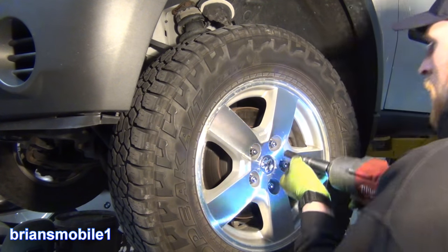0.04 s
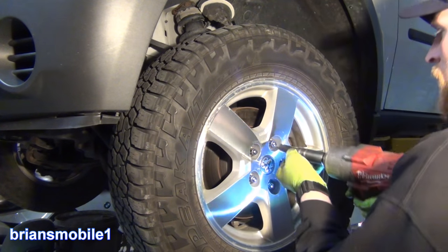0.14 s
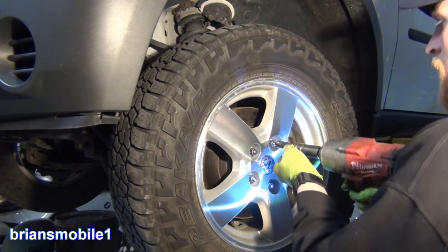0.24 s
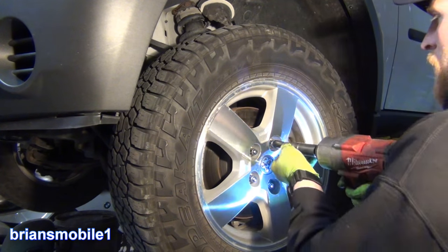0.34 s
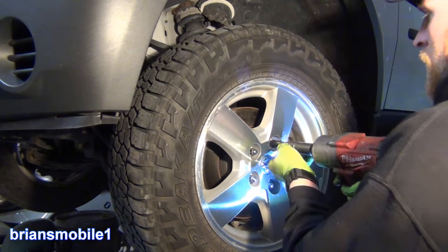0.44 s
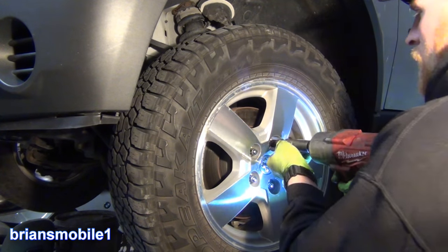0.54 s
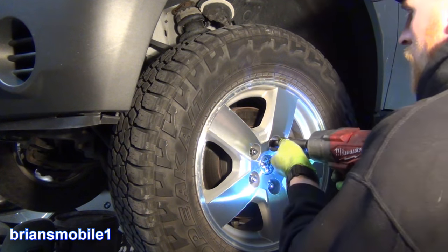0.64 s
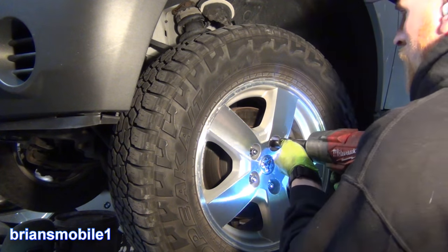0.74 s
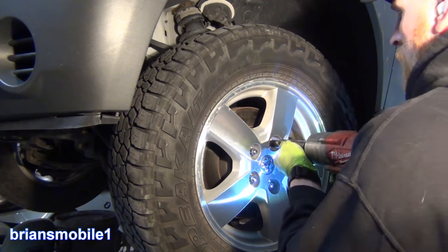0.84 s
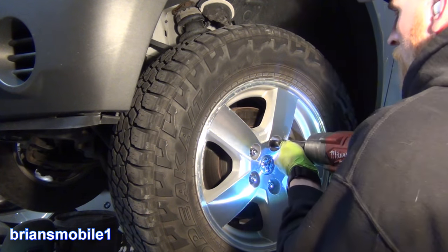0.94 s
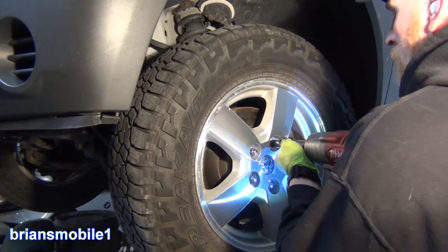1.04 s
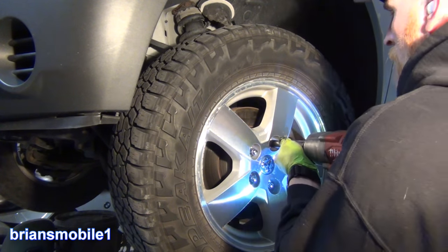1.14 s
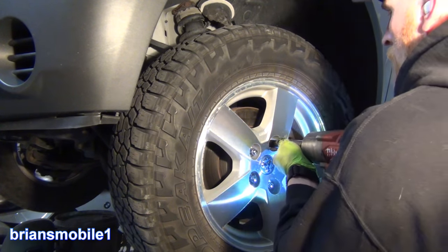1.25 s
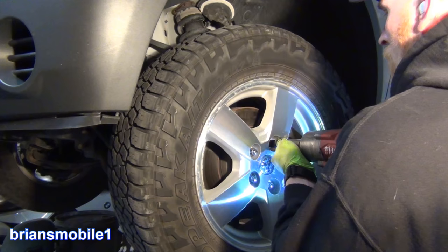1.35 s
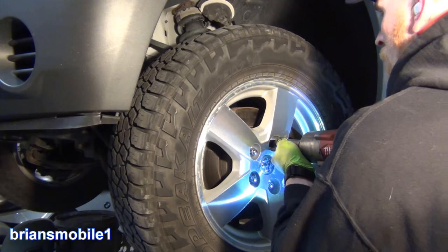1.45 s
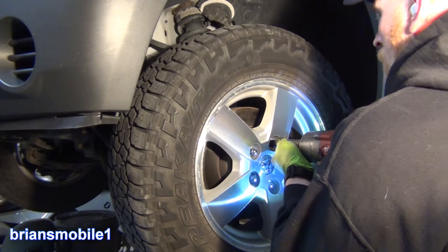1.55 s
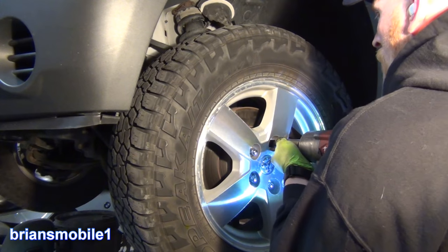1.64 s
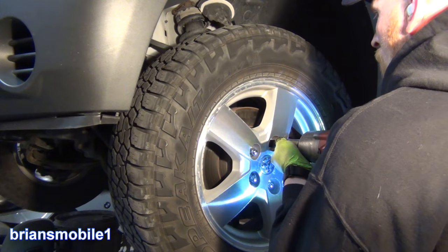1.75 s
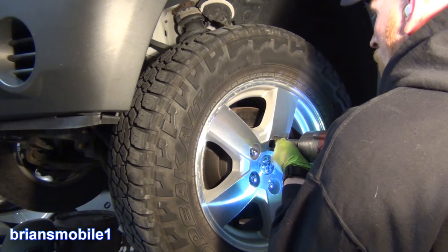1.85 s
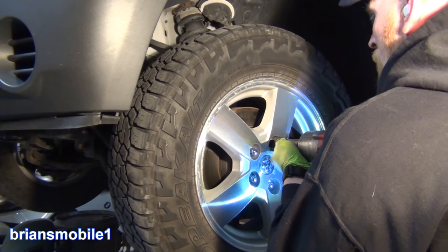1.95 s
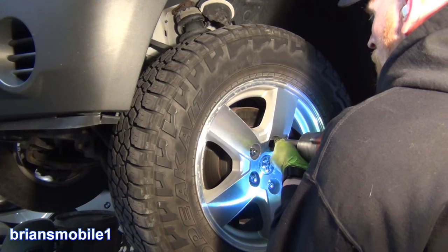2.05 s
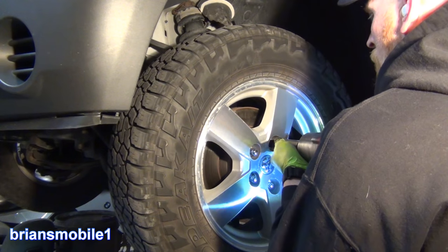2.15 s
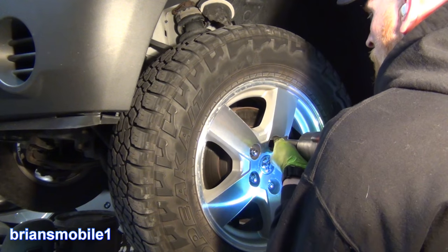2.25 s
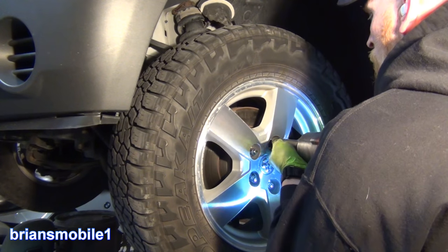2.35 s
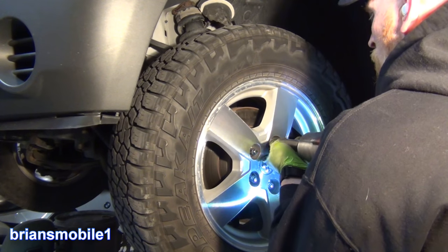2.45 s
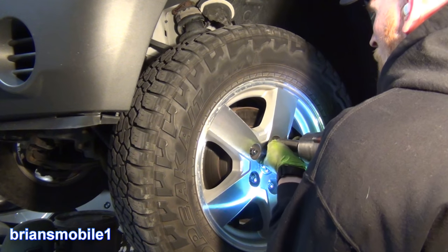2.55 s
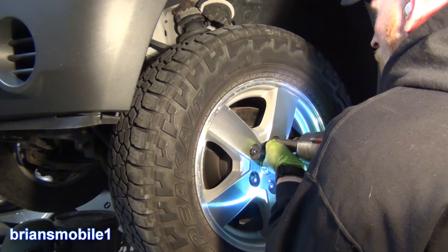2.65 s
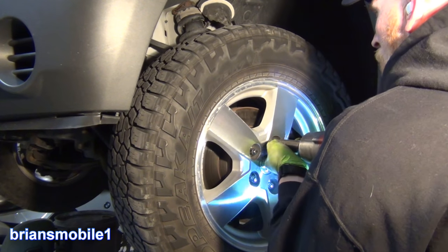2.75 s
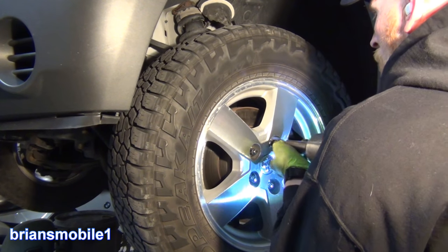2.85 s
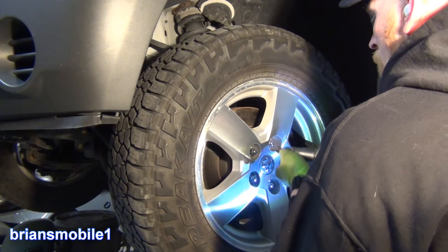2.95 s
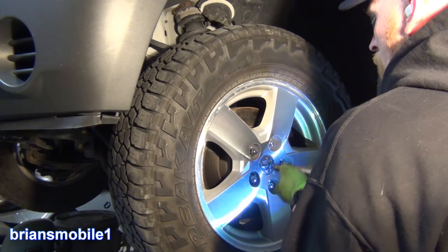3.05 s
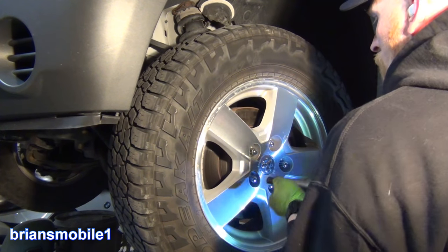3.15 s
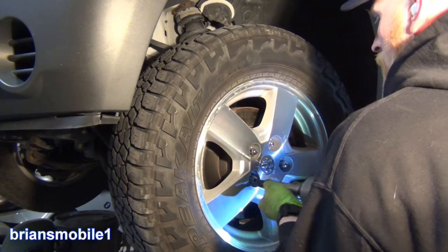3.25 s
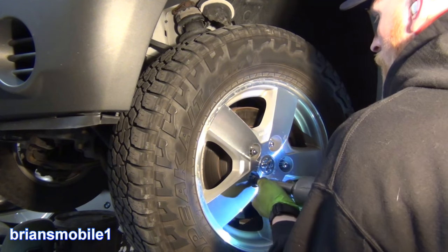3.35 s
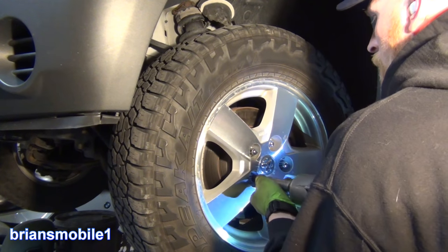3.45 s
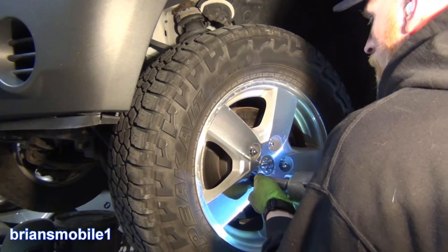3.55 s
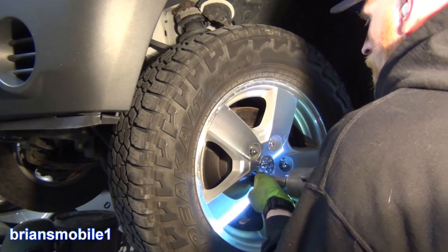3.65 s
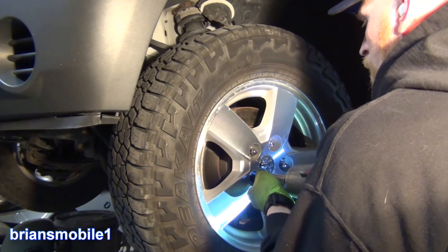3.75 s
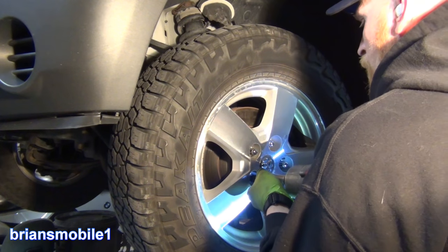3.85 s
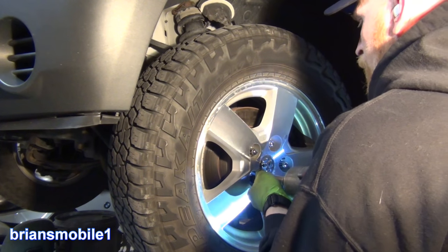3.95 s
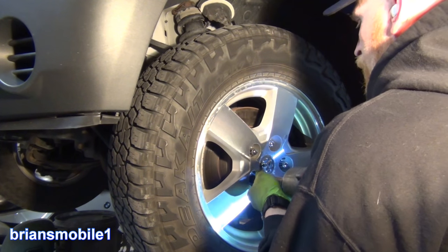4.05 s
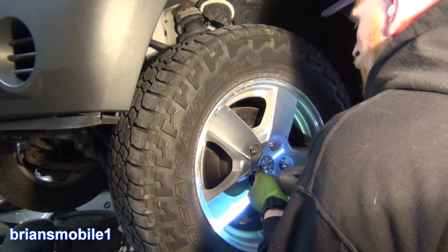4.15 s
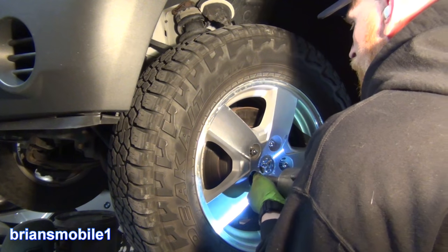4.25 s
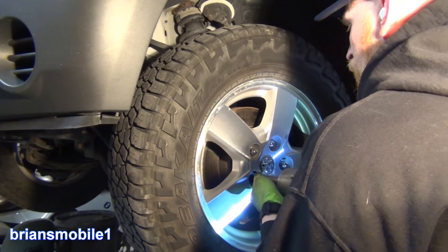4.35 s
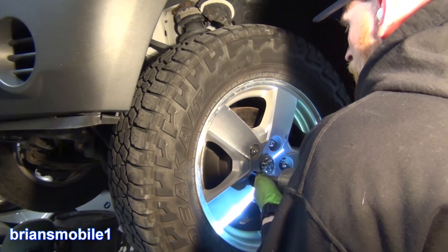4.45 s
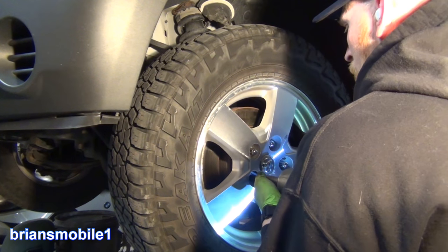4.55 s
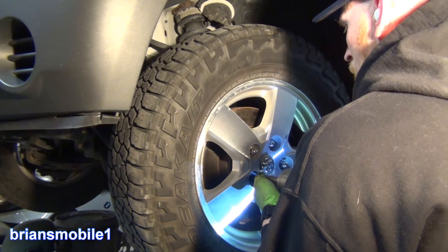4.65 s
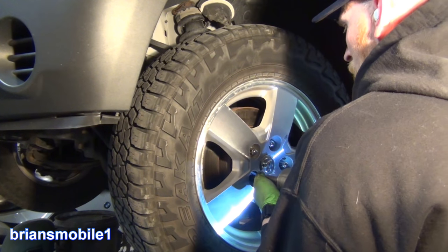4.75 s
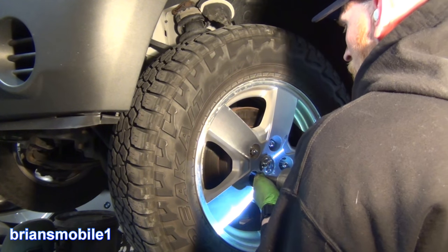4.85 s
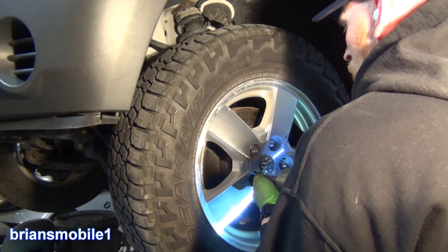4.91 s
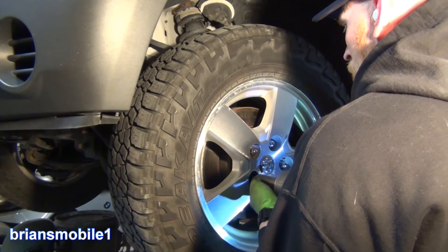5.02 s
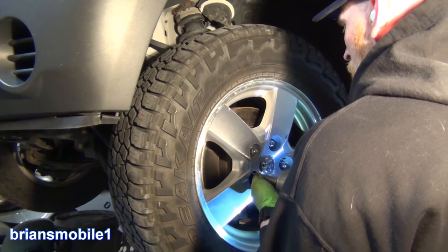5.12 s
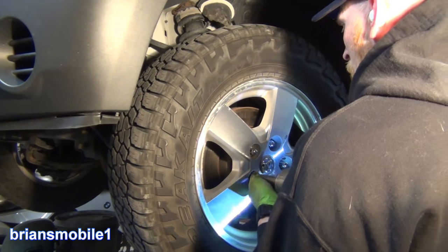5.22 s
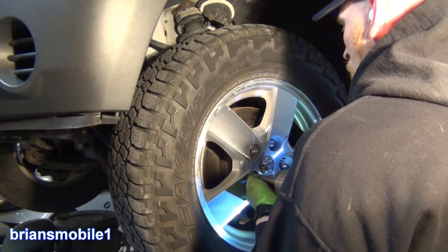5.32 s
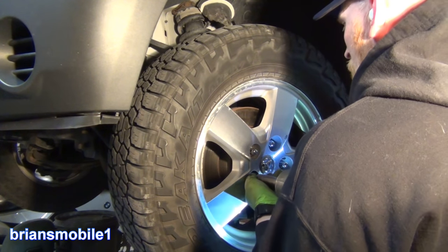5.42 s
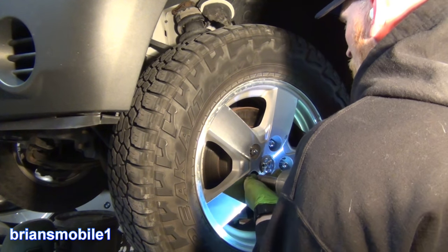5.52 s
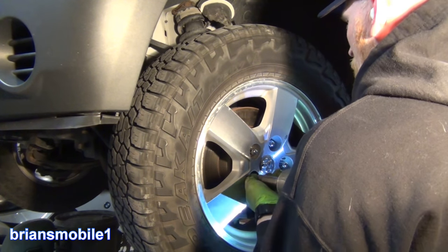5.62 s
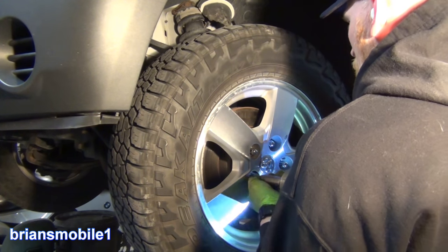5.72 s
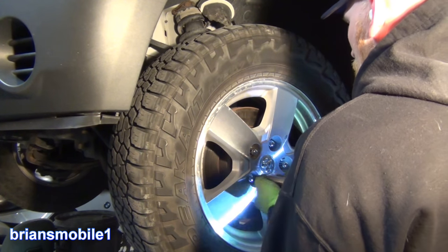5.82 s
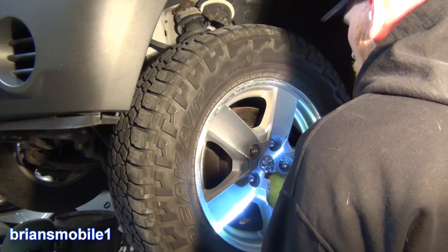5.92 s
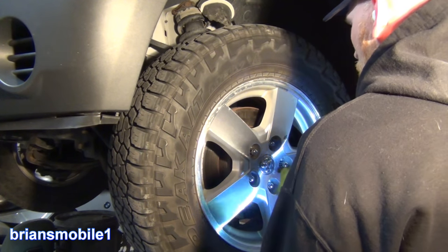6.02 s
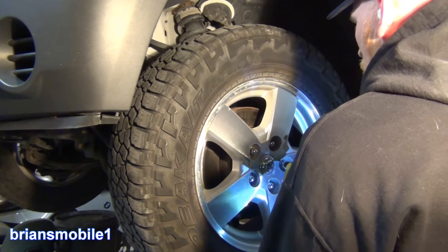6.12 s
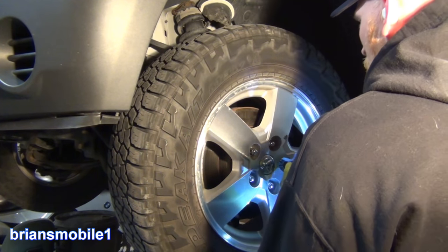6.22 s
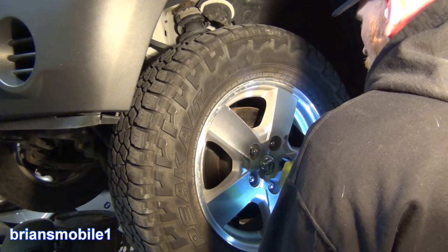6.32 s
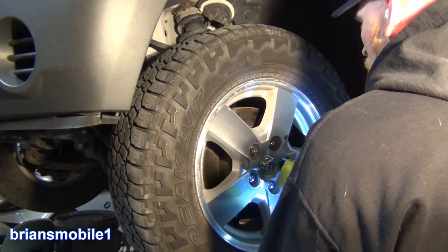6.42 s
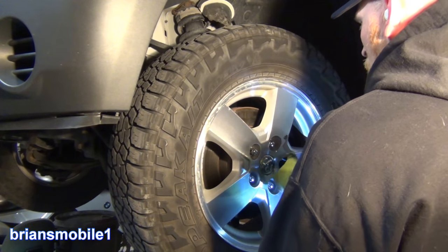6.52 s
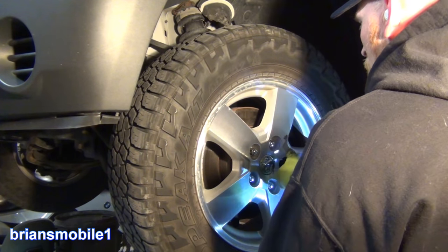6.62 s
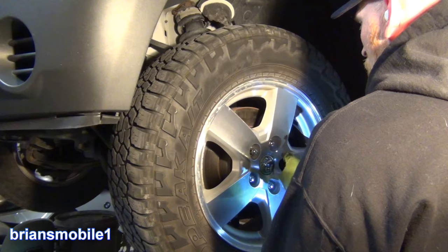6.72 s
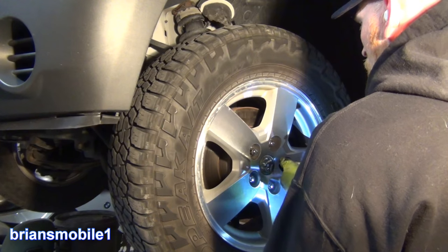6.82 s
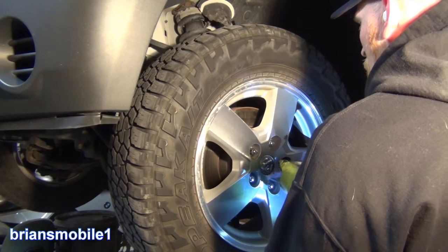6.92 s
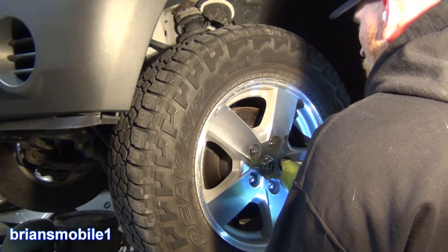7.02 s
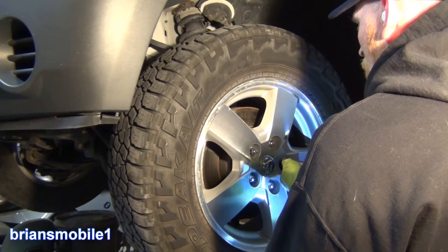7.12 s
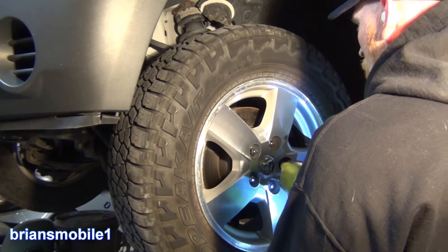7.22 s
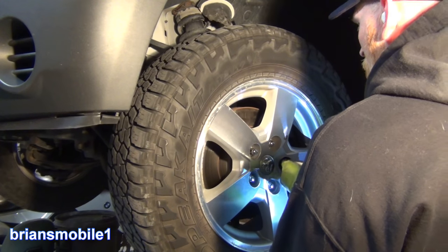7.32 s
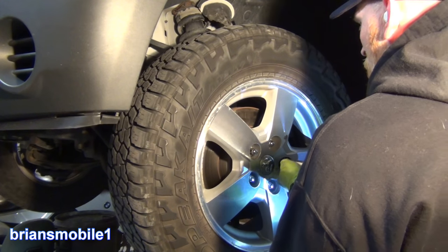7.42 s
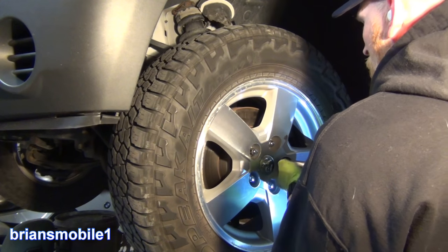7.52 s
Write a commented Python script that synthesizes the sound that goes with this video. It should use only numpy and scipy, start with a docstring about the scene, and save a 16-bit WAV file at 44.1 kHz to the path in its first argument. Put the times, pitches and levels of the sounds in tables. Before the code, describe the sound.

A socket scrapes and clicks onto a wheel, then a cordless impact wrench whines up, hammers and coasts down, nut after nut, in a garage.

```python
"""A socket scrapes and clicks on a wheel in a garage; then a cordless impact wrench runs on three lug nuts.
Scrapes are coloured friction grains; knocks, jolts and blows are noise cracks and damped modes.
Motor whine and gear tones are sinusoids locked to the rotor speed; gear whir and hammer clatter are
filtered grain noise. Sparse decaying echoes and a fading background wash surround the tool."""
import sys
import numpy as np
from scipy import signal
from scipy.fft import rfft, irfft, next_fast_len
from scipy.io import wavfile
from scipy.ndimage import uniform_filter1d, minimum_filter1d

SR = 44100
rng = np.random.default_rng(int(sys.argv[2]) if len(sys.argv) > 2 else 0)


def unload_audio(sound):
    """Save the sound as a 16-bit wav file, at the path given as the first command line argument."""
    columns = np.transpose(np.atleast_2d(sound))
    # keep every value between -1 and 1, then stretch to whole-number steps
    steps = np.round(np.clip(columns, -1, 1) * 32767)
    wavfile.write(sys.argv[1], SR, steps.astype(np.int16))


N = 333912


def gain_of(db):
    """Logarithmic level: decibels become an amplitude factor."""
    return 10 ** (np.asarray(db) / 20)


def evened(x):
    """Power normalisation: scales to rms 1."""
    return x / np.sqrt(np.mean(x ** 2) + 1e-20)


def read(points, hz):
    """Logarithmic frequency scale: interpolates a spectrum table at the given frequencies."""
    f, value = np.transpose(points)
    return np.interp(np.log(hz + 1), np.log(f + 1), value)


def add(mix, s, sound):
    """Superposition: adds a sound into the mix from time s."""
    part = mix[round(s * SR):][:len(sound)]
    part += sound[:len(part)]


def colour(x, points):
    """Linear filtering: weights the spectrum by a table, without phase shift."""
    size = next_fast_len(x.shape[-1])
    gain = gain_of(read(points, np.fft.rfftfreq(size, 1 / SR)))
    return irfft(rfft(x, size) * gain, size)[..., :x.shape[-1]]


def wander(size, seconds):
    """Slow random modulation: twice-averaged noise of rms 1."""
    span = int(seconds * SR)
    once = uniform_filter1d(rng.standard_normal(size), span)
    return evened(uniform_filter1d(once, span))


def rattle(size, points, grain_db):
    """Granular excitation: dense tiny contacts of uneven size, heard through a body."""
    grains = rng.standard_normal(size) * gain_of(grain_db * wander(size, 0.00063))
    return evened(colour(grains, points))


def ring(modes, t):
    """Modal decay: the exponentially dying modes of a struck object, each excited a little differently."""
    out = 0
    for hz, db, t60 in modes:
        level_db = db + 3 * rng.standard_normal() - 60 * t / t60
        out = out + gain_of(level_db) * np.sin(2 * np.pi * hz * t)
    return out


# spectrum of the distant wash: f/Hz, level/dB (per Hz, relative)
WASH_SPECTRUM = [(25, -25.5), (60, -2.5), (900, -2), (2000, -8.5), (8000, -12.5), (16000, -21.5)]
# fading of the wash: t/s, level/dB
WASH_FADE = [(0, -45.5), (.9, -48.5), (3.2, -53), (6, -57.5)]
# faint steady tone: f/Hz, level/dB
STEADY_TONES = [(931, -75)]


def shop():
    """Partial coherence: a distant wash largely shared by both ports, plus a faint steady tone."""
    t = np.arange(N) / SR
    shared, apart = rng.standard_normal(N), rng.standard_normal((2, N))
    fade = gain_of(np.interp(t, *np.transpose(WASH_FADE)))
    wash = evened(colour(shared + 0.2 * apart, WASH_SPECTRUM)) * fade
    return wash + sum(np.sqrt(2) * gain_of(db) * np.sin(2 * np.pi * hz * t) for hz, db in STEADY_TONES)


# spectrum of struck or rubbed steel, also the hammer clatter: f/Hz, level/dB (per Hz, relative)
STEEL_SPECTRUM = [(75, -22), (97, -3.5), (125, -11), (295, -1), (1060, 2.9), (3900, 2), (7600, 5.5),
                  (9500, -2.5), (16000, -21.5)]
# socket sliding over steel: start t/s, swell t/s, peak level/dB, fade level/dB per s, length t/s, strongest f/Hz
SLIDES = [(0, 0.1, -43, -74, 0.27, 7600), (0.292, 0.064, -22, -300, 0.17, 2030),
          (0.493, 0.017, -20, -900, .055, 2970), (1.199, 0.029, -19.5, -100, 0.061, 6450),
          (3.496, 0.0059, -29, -400, .1, 2700), (6.303, .005, -38, -200, 0.21, 3100)]
SWELL_DB = -7  # a slide starts this far under its peak
SCRAPE_LIFT_DB = 9  # at the strongest pitch, tapering to none an octave either side


def scrapes():
    """Friction: contact grains under each slide swell, then fade exponentially."""
    out = np.zeros(N)
    for s, swell, peak_db, fade_db, length, hz in SLIDES:
        t = np.arange(0, length, 1 / SR)
        db = peak_db + SWELL_DB * np.maximum(1 - t / swell, 0) + fade_db * np.maximum(t - swell, 0)
        lift = [(hz / 2, 0), (hz, SCRAPE_LIFT_DB), (2 * hz, 0)]
        grains = evened(colour(rattle(len(db), STEEL_SPECTRUM, 1.6), lift))
        add(out, s, gain_of(db) * grains * signal.windows.tukey(len(db), .04))
    return out


# reverberation time by band: f/Hz, t60/s
GARAGE_DECAY = [(200, 0.69), (5000, 0.51), (12000, 0.12)]
# echoes unlike at the two ports, against the shared ones: f/Hz, level/dB
UNLIKE_ECHOES = [(60, 12.5), (2200, -30), (5500, -4), (14000, -10.5)]


def garage(x):
    """Reverberation: sparse echoes of random sign, each band dying at its own rate, partly alike at both ports."""
    taps = np.zeros((3, SR))
    # one echo at a random place in every 20 samples
    at = np.arange(200, SR - 20, 20) + rng.integers(0, 20, (3, (SR - 201) // 20))
    np.put_along_axis(taps, at, rng.choice([-1., 1.], at.shape), 1)
    hz, t, bands = signal.stft(taps[2] + colour(taps[:2], UNLIKE_ECHOES), SR, nperseg=256)
    decay = gain_of(-60 * t / read(GARAGE_DECAY, hz)[:, None])
    tail = signal.istft(bands * decay, SR, nperseg=256)[1]
    return signal.fftconvolve(x[None], tail / np.linalg.norm(tail[0]), axes=1)[:, :N]


def crack(t, quick, slow, share):
    """Impact transient: steel-coloured noise with a quick and a slow decay; too small to radiate bass."""
    burst = rattle(len(t), STEEL_SPECTRUM, 2.95) * (np.exp(-t / quick) + share * np.exp(-t / slow))
    return signal.lfilter(*signal.butter(2, 350, "high", fs=SR), burst)


# socket and anvil knocks, before the mix factors: t/s, crack and wheel level/dB, thud level/dB, socket level/dB
KNOCK_EVENTS = [(0.487, -22, -45, -28), (0.5627, -22.5, -23, -58), (0.6305, -32, -33, -54),
                (0.9747, -27, -57, -52), (1.0238, -12.5, -77, -50.5), (1.2127, -39, -55, -3.5),
                (1.266, -11, -51, -36), (2.4506, -7.5, -18.5, -37), (2.885, -40.5, -63, -34),
                (3.391, -19, -11, -45), (3.48, -30, -42, -16.5), (3.548, -31.5, -45.5, -26),
                (3.5784, -22, -21, -51), (3.989, -28.5, -50, -42), (4.0609, -16, -24, -35),
                (4.0812, -16.5, -34, -9.5), (4.21, -15, -37, -39.5), (4.247, -14, -22, -42),
                (4.269, -14, -31, -37), (5.0442, -18, -4, -54.5), (5.827, -29.5, -60, -15),
                (6.306, -32, -68, -20.5), (6.3926, -37, -42, -63), (6.621, -14, -19, -19),
                (6.7247, -23.5, -40, -49), (6.779, -12, -21.5, -22)]
# modes of the wheel, before detuning and damping: f/Hz, level/dB, t60/s
WHEEL_MODES = [(1060, -29, 0.34), (1395, -26, 0.18), (1783, -9, 0.28), (2785, -3, 0.091),
               (4500, -21, 0.087), (8120, 12, 0.021)]
# modes of tyre and rim, before detuning: f/Hz, level/dB, t60/s
THUD_MODES = [(220.5, -11, 0.15), (295, 4, 0.08), (677.5, 3.5, 0.045), (1495, -4, 0.1)]
# modes of the socket: f/Hz, level/dB, t60/s
SOCKET_MODES = [(10160, -4.5, 0.077), (11200, -14.5, 0.1)]
# one knock leaves a low mode of the rim ringing: t/s, level/dB
FREE_RIM_RING = (6.621, -27)
KNOCK_DAMPING_S = 0.051  # the gloved hand damps the wheel


def knocks():
    """Impact excitation: a crack sets off the wheel, the tyre's thud at a varying pitch and the socket's thin ring."""
    out, t = np.zeros(N), np.arange(9000) / SR
    for s, db, thud_db, socket_db in KNOCK_EVENTS:
        snap = 0.62 * crack(t, 0.0016, 0.011, 0.95)
        wheel = 0.35 * ring(WHEEL_MODES, t * rng.uniform(.9, 0.97)) * np.exp(-t / KNOCK_DAMPING_S)
        add(out, s, gain_of(db) * (snap + wheel))
        # the pitch varies with the spot struck
        thud = ring(THUD_MODES, t * rng.uniform(.88, 1.1)) * (0.62 + 0.83 * wander(len(t), 0.0012))
        socket = ring(SOCKET_MODES, t)
        add(out, s, 0.41 * gain_of(thud_db) * thud + 0.73 * gain_of(socket_db) * socket)
    s, db = FREE_RIM_RING
    hz, _, t60 = WHEEL_MODES[2]
    add(out, s, ring([(hz, db, t60)], t))
    return out


BRAKE_S, STALL_S, STALLED = .06, 0.082, 0.5  # the tightening nut brakes the rotor to this share of its speed


def rotor(rows):
    """Rotational inertia: start time and speed of one pull through spin-up, braking and a short slow stretch."""
    s, hz = rows[-1]
    braked = [(s + BRAKE_S, STALLED * hz), (s + BRAKE_S + STALL_S, STALLED * hz)]
    times, speeds = np.transpose(rows + braked)
    return times[0], np.interp(np.arange(times[0], times[-1], 1 / SR), times, speeds)


# rotor spin-up, one curve a trigger pull: t/s, speed f/Hz
SPIN_UPS = [
    [(.938, 5), (1.05, 140), (1.25, 277), (1.36, 334), (1.45, 358), (1.75, 385), (2.01, 378)],
    [(2.36, 60), (2.45, 170)],
    [(3.952, 5), (4.15, 191), (4.35, 304), (4.45, 425), (4.55, 466), (4.65, 492), (5.0, 523)],
    [(6.71, 5), (6.75, 162), (6.8, 390), (6.84, 462), (6.88, 524), (6.94, 578), (7.04, 657), (7.09, 684),
     (7.15, 702)],
]
# trigger pulls: anvil engages t/s, nut seats t/s, trigger released t/s, whir level/dB at 400 Hz,
# hammering level/dB, whine level/dB and gear tone level/dB over the whir
TRIGGER_PULLS = [(1.01, 2.092, 2.304, -21, -15.5, -5, 0), (2.457, 2.497, 2.614, -13.5, -18.5, -12.5, -3),
                 (4.017, 5.09, 5.587, -21.5, -16.5, -7.5, -1), (6.79, 7.198, 7.31, -21, -14.5, -15, 1.5)]
# lines of the whine: multiple of the speed above the chopper, relative level/dB
WHINE_LINES = [(-5, -8), (-4, -6), (-2, -5), (-1, 3.8), (0, 3), (1, 4), (2, -7.5)]
# gear and pole tones: multiple of the speed, relative level/dB at part trigger, relative level/dB at full trigger
GEAR_TONES = [(3, -13, -40), (3.25, -9, -30), (3.6, -30, -16), (4, -8, -28), (5, -10, -26), (5.4, -22, -9),
              (6, -10, -8), (6.6, -20, -8), (9.2, -26, -9), (12, -29, -14)]
# how well the housing radiates a tone: f/Hz, level/dB
HOUSING_RESPONSE = [(1180, 3), (1500, -10), (1680, 2), (2070, 2), (2330, -8), (2780, 5), (3300, -9),
                    (4200, -2), (5000, -15), (6200, -2), (7000, -12), (8300, 7)]
CHOPPER_HZ = 7889
CENTRE_DB_PER_DOUBLING = -4  # the bare chopper line gives way to its sidebands above 100 Hz


def tone(cycles, db):
    """Phase accumulation: a sinusoid of random phase whose level wanders."""
    level = gain_of(db + 2.27 * wander(len(cycles), 0.03))
    return np.sqrt(2) * level * np.sin(2 * np.pi * (cycles + rng.random()))


def motor(whir_db):
    """Modulation sidebands and meshing orders: chopper lines and gear tones, all locked to the rotor."""
    out = np.zeros(N)
    for rows, (*_, over_db, gear_db) in zip(SPIN_UPS, TRIGGER_PULLS):
        s, speed = rotor(rows)
        turns, chops = np.cumsum(speed) / SR, CHOPPER_HZ * np.arange(len(speed)) / SR
        doublings = np.log2(speed / 400)
        stall_db = 7 * np.log2(speed / np.maximum.accumulate(speed))  # tones fade as the load brakes the rotor
        load_db = whir_db[round(s * SR):][:len(speed)] + stall_db
        whine_db = np.maximum(load_db, -37) + over_db  # the floor lets the chopper sing before spin-up
        whine = 0
        for k, db in WHINE_LINES:
            line_db = whine_db + db
            if k == 0:
                line_db = line_db + CENTRE_DB_PER_DOUBLING * np.maximum(doublings + 2, 0)
            if k < -3:  # far sidebands need a case resonance
                line_db = line_db - 6 * ((CHOPPER_HZ + k * speed - 5900) / 260) ** 2
            whine = whine + tone(chops + k * turns, line_db)
        octave = sum(tone(2 * chops - k * turns, whine_db - 30) for k in (1, 3))
        # at part trigger the tones firm up as the speed settles
        settle_db = 36 * np.log2(speed / speed.max())
        gears = 0
        for k, part_db, full_db in GEAR_TONES:
            if rows is SPIN_UPS[-1]:  # the last pull is at full trigger
                order_db = full_db + 20 * np.minimum(doublings, 0)
            else:
                order_db = part_db + settle_db
            radiated_db = order_db + read(HOUSING_RESPONSE, k * speed)
            gears = gears + tone(k * turns, load_db + 2 * stall_db + gear_db + radiated_db)
        add(out, s, (whine + octave + gears) * signal.windows.tukey(len(speed), 300 / len(speed)))
    return out


# spectrum of the running gears: f/Hz, level/dB (per Hz, relative)
RUNNING_SPECTRUM = [(75, -18), (97, -3.5), (125, -20.5), (290, -3), (600, -4), (1060, 1.5), (1550, -0.5),
                    (1830, 7), (2550, -1.5), (2850, 11), (3150, 2.5), (7750, -1.5), (11200, -8.5),
                    (16000, -43.5)]
# the anvil sings in the clatter: f/Hz, level/dB
ANVIL_RESONANCE = [(4050, 0), (4450, 5), (4850, 0)]
PLAY_S, SLACK_DB, WHIR_DB_PER_DOUBLING = .03, -2.5, 6  # gears bite after the play; quieter until the anvil engages
COAST_DB_PER_S, COAST_DB_PER_S2, COAST_S = -85.5, -300, .32  # the level falls ever faster after release
BLUR_PER_DOUBLING = 0.79  # above 400 Hz the whir takes on the wide colour of the clatter


def whir():
    """Contact noise: gear rattle grows with speed, turns to hammer clatter and fades; also returns its level."""
    out, power = np.zeros(N), np.zeros(N)
    for rows, (engaged, seated, released, run_db, hammer_db, *_) in zip(SPIN_UPS, TRIGGER_PULLS):
        s = rows[0][0] + PLAY_S
        t = np.arange(s, released + COAST_S, 1 / SR)[:N - round(s * SR)]
        doublings = np.log2(np.interp(t, *np.transpose(rows)) / 400)
        hammer = np.clip((t - seated) / .03, 0, 1)
        coast = np.maximum(t - released, 0)
        run_db = run_db + WHIR_DB_PER_DOUBLING * doublings + SLACK_DB * (t < engaged)
        db = run_db + (hammer_db - run_db) * hammer
        db = db + COAST_DB_PER_S * coast + COAST_DB_PER_S2 * coast ** 2
        clatter = colour(rattle(len(db), STEEL_SPECTRUM, 3.1), ANVIL_RESONANCE)
        clatter = clatter * gain_of(3 * wander(len(db), .007))  # lumpier than the whir
        wide = np.maximum(hammer, np.clip(BLUR_PER_DOUBLING * doublings, 0, 1))
        running = rattle(len(db), RUNNING_SPECTRUM, 1.97)
        add(out, s, gain_of(db) * (np.sqrt(1 - wide) * running + 0.96 * np.sqrt(wide) * clatter))
        add(power, s, gain_of(2 * db))
    return out, 10 * np.log10(power + 1e-9)


# hammer jolts that ring in the wheel, before shaping: t/s, level/dB, strongest f/Hz
HAMMER_JOLTS = [(2.083, -11, 1060), (2.096, -7, 1800), (2.121, -9, 1090), (2.2, -11, 1060),
                (2.218, -9, 1080), (2.269, -15, 1060), (2.449, -14, 1040), (2.537, -14, 1085),
                (5.064, -8, 1070), (5.087, -8.5, 1390), (5.137, -11.5, 1770), (5.283, -15.5, 1650),
                (5.297, -14, 1400)]
JOLT_DAMPING_S, JOLT_FOCUS_DB = 0.0093, -11  # the pressed socket damps the ring; modes weaken per octave away


def jolts():
    """Modal participation: each jolt rings most the wheel modes nearest its strongest pitch."""
    out, t = np.zeros(N), np.arange(5000) / SR
    for s, db, hz in HAMMER_JOLTS:
        near = [(f, JOLT_FOCUS_DB * abs(np.log2(f / hz)), t60) for f, _, t60 in WHEEL_MODES]
        shape = np.minimum(t / 0.0027, 1) * np.exp(-t / JOLT_DAMPING_S)
        add(out, s, gain_of(db) * ring(near, t) * (1 + 0.68 * wander(len(t), 0.0018)) * shape)
    return out


# hammer on anvil: t/s
BLOW_TIMES = [2.085, 2.138, 2.164, 2.249, 2.552, 5.0997, 5.2277, 5.298, 5.3657, 5.4204, 5.471, 5.538,
              7.1641, 7.192, 7.272]
# first tick of the loose anvil as the motor coasts down: t/s
FIRST_TICKS = [2.621, 5.618]
TICK_GAP_S, TICK_SLOWING = .021, 1.1  # first gap; each gap is longer than the last by this ratio
TICK_DB, TICK_GAIN_DB = 4.5, 1  # over the whir, and gained with each tick as the whir dies


def blows(whir_db):
    """Impulsive impact: each blow is a quick crack and a burst of steel; soft ticks come ever further apart."""
    out, t = np.zeros(N), np.arange(3000) / SR
    for s in BLOW_TIMES:
        blow = crack(t, .0004, .015, .045) + .04 * ring(WHEEL_MODES, t)
        add(out, s, gain_of(whir_db[round(s * SR)] + 24) * blow)
    lags = TICK_GAP_S * (TICK_SLOWING ** np.arange(6) - 1) / (TICK_SLOWING - 1)
    for first in FIRST_TICKS:
        for k, s in enumerate(first + lags):
            tick = crack(t, 0.0033, 0.01, 0.21) + 0.19 * ring(WHEEL_MODES, t)
            add(out, s, gain_of(whir_db[round(s * SR)] + TICK_DB + k * TICK_GAIN_DB) * tick)
    return out


def scene():
    """Superposition: direct sound of tool and wheel, its echoes in the garage and the background."""
    gears, whir_db = whir()
    tool = gears + motor(whir_db) + blows(whir_db) + jolts() + knocks() + scrapes()
    return tool + gain_of(-9.5) * garage(tool) + shop()


# microphone bass roll-off: f/Hz, level/dB
BASS_ROLL_OFF = [(25, -23), (90, -4)]
# left port over right: f/Hz, level/dB
LEFT_OVER_RIGHT = [(60, 7), (130, 7), (400, 3), (1500, 0.3)]
EDGE_HZ = 15800  # upper band limit


def record(dry):
    """Transduction: the left port favours bass, a look-ahead limiter ducks just before overloads, then a band limit."""
    dry = colour(dry, BASS_ROLL_OFF)
    lift = np.array(LEFT_OVER_RIGHT)
    # half the level difference goes to each port
    ports = np.array([colour(dry[0], lift * [1, .5]), colour(dry[1], lift * [1, -.5])])
    allowed = .62 / np.maximum(abs(ports).max(0), .62)
    ahead = np.roll(minimum_filter1d(allowed, size=120), -45)  # sees peaks about 2.5 ms early
    limited = ports * uniform_filter1d(ahead, size=24)
    low_pass = signal.firwin(511, EDGE_HZ, window=("kaiser", 9), fs=SR)
    return signal.oaconvolve(limited, low_pass[None], "same")


dry = scene()
out = record(dry)
unload_audio(out)
```